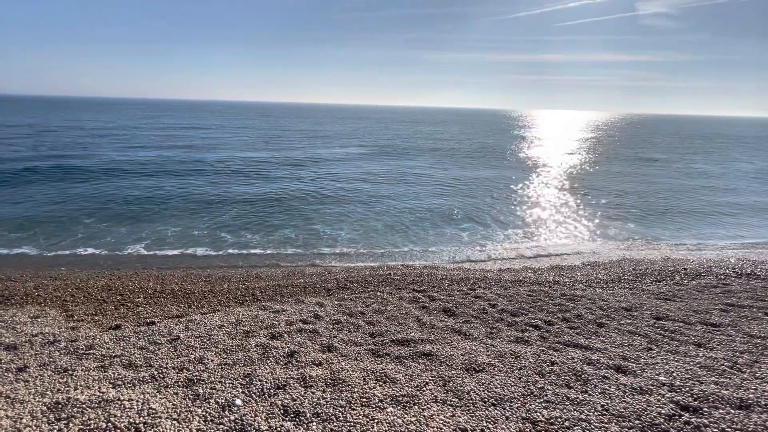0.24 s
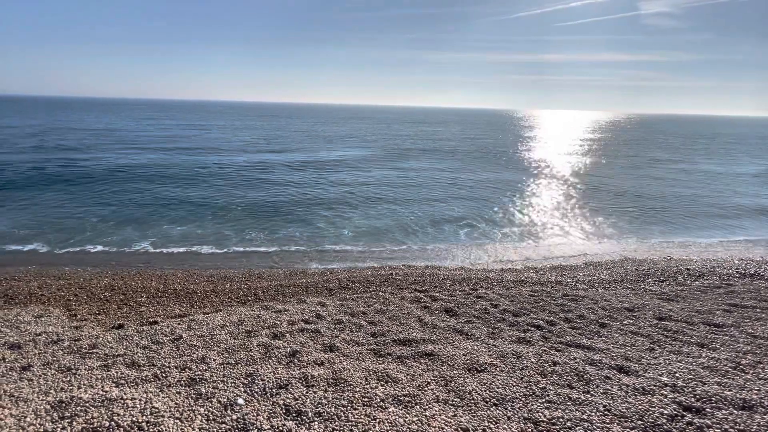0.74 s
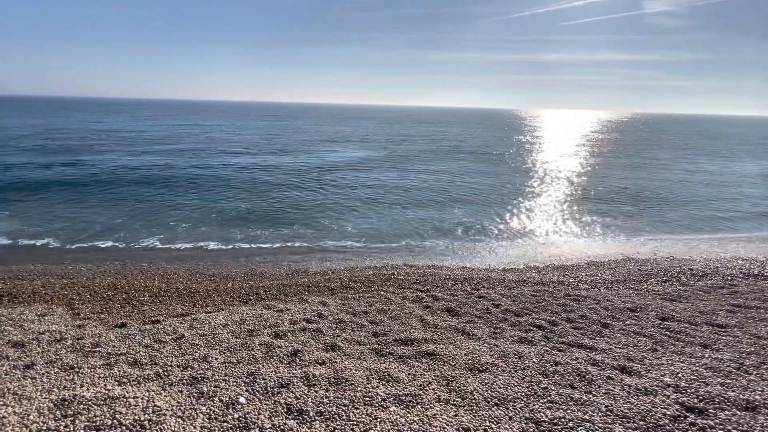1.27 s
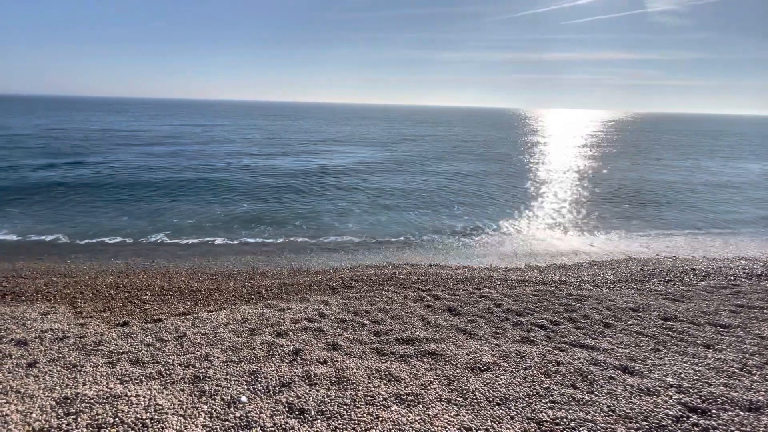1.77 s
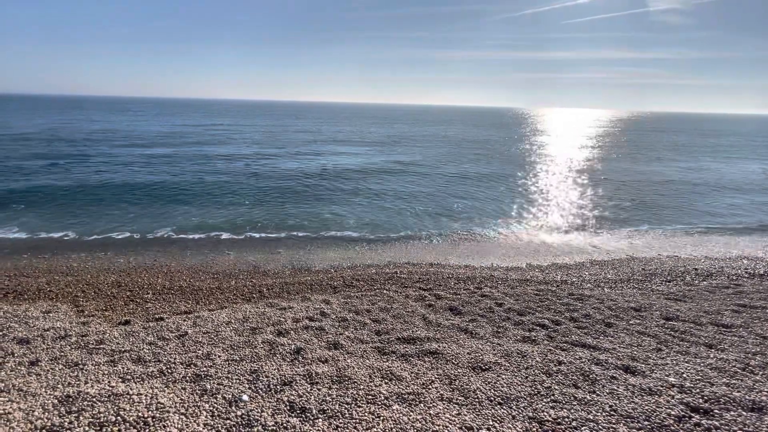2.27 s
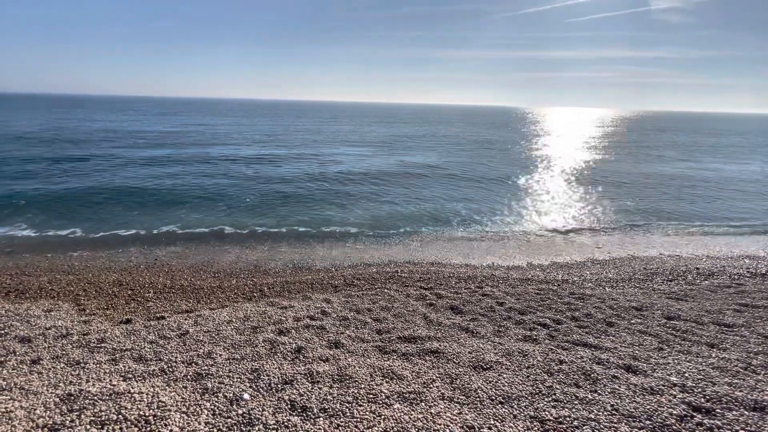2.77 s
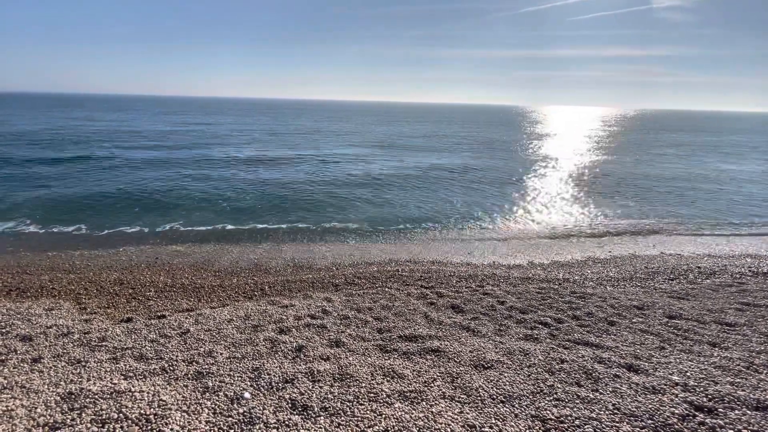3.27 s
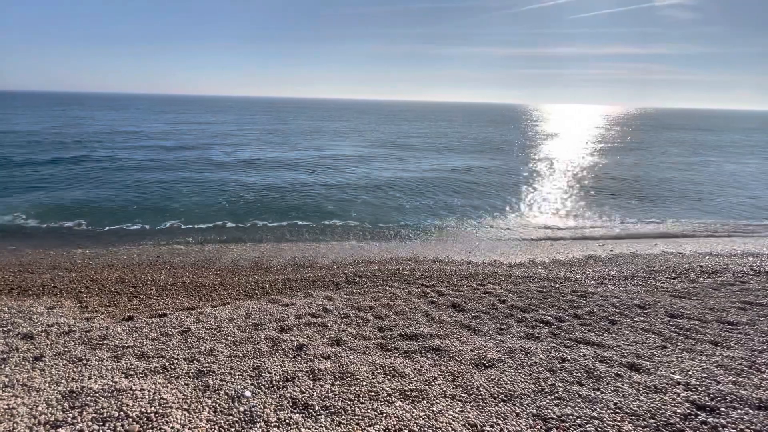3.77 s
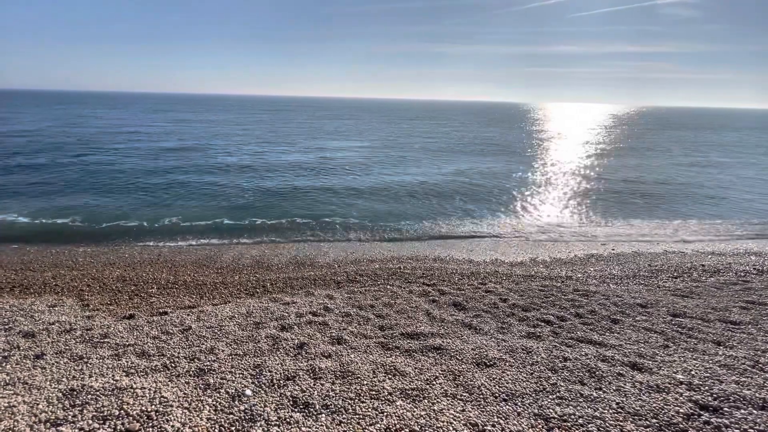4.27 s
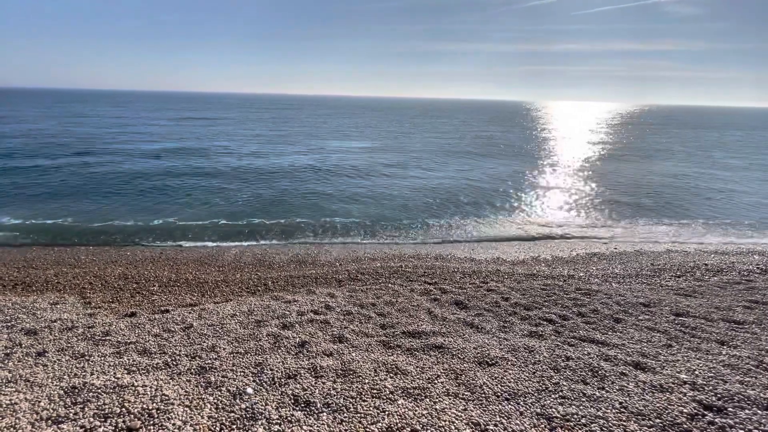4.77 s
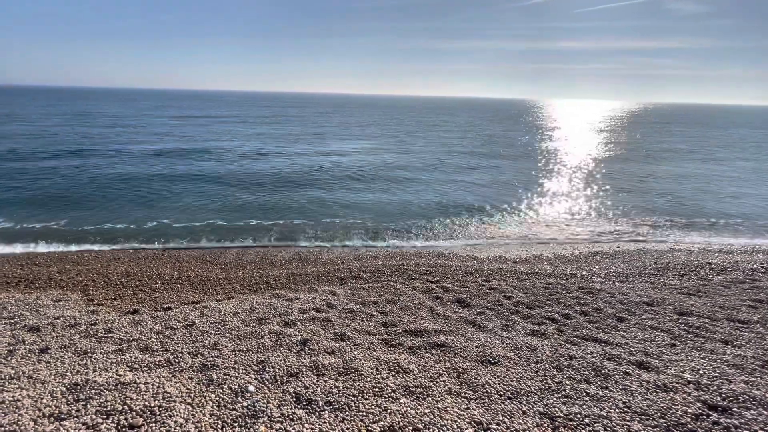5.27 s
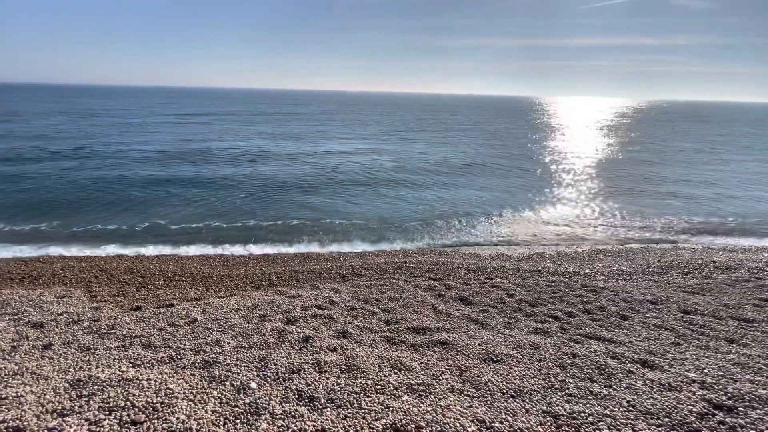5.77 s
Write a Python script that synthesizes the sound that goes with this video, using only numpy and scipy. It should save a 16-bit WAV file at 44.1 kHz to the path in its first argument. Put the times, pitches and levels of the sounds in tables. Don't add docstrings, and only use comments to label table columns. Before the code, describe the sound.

Close on an open shingle beach, foam fizzes steadily while retreating water drags pebbles in a dense rattle, strongest around the middle. A small wave then rolls over and crashes with a fuller, lower wash and light spray. Wind flutters the stereo microphone, thumping hard just after four seconds, above a very faint distant engine hum.

```python
import sys
import numpy as np
from scipy import signal
from scipy.fft import rfft, irfft
from scipy.io import wavfile
from scipy.ndimage import uniform_filter1d

SR = 44100
rng = np.random.default_rng(int(sys.argv[2]) if len(sys.argv) > 2 else 0)


def linear_from_db(decibels):
    return 10 ** (np.asarray(decibels, float) / 20)


def store_wav(level_fs):
    pcm = np.round(np.clip(np.atleast_2d(level_fs), -1, 1) * 32767)
    wavfile.write(sys.argv[1], SR, pcm.T.astype(np.int16))


N = 265393
FRAME, HOP = 1024, 256

# (frequency [Hz], left-right coherence [0-1], extra lead [rad])
CRASH_PORTS = [(250, 0.85, -0.1), (400, 0.9, 0.1), (550, 0.8, 0.1), (750, 0.64, -0.4), (950, 0.9, -0.2),
               (1200, 0.78, -0.4), (1450, 0.33, -1.2), (1700, 0.82, -1.3), (1950, 0.89, -1.3),
               (2200, 1, -2.8), (2500, 0.96, -2.2), (2800, 0.9, 0.0), (3100, 0.55, 0.6), (3400, 0.45, -0.4),
               (3800, 0.94, 0.4), (4200, 0.54, -0.2), (4700, 0.85, -0.3), (5200, 0.79, -0.1),
               (5700, 0.94, 0.2), (6200, 0.46, -0.3), (6700, 0.71, -0.1), (7300, 0.24, -0.2),
               (8000, 0.4, -0.1), (8800, 0.47, 0.0), (10300, 0.5, 0)]


def evened(x):
    return x / np.sqrt(np.mean(abs(x) ** 2) + 1e-20)


def columns(table, at, log=False):
    x, *values = np.transpose(table)
    bend = np.log1p if log else np.asarray
    return [np.interp(bend(at), bend(x), v) for v in values]


def drift(count, slow_hz, fast_hz, rate):
    t = np.arange(count) / rate
    total = 0
    for f in np.geomspace(slow_hz, fast_hz, 24):
        total = total + np.sin(2 * np.pi * (f * t + rng.random())) / np.sqrt(f)
    return evened(total)


def spectra(x):
    return signal.stft(x, SR, nperseg=FRAME, noverlap=FRAME - HOP)


def waveform(z):
    return signal.istft(z, SR, nperseg=FRAME, noverlap=FRAME - HOP)[1][:, :N]


def patchwork(shape, bands, frames):
    field = uniform_filter1d(rng.standard_normal(shape), size=bands, axis=-2)
    return evened(uniform_filter1d(field, size=frames, axis=-1))


def humps(t, crest, rise, fall):
    late = t - crest[:, None]
    width = np.where(late < 0, rise[:, None], fall[:, None])
    return np.exp(-2 * (late / width) ** 2)


def summed_db(bells, db, calm_db):
    return 10 * np.log10(linear_from_db(db) ** 2 @ bells + linear_from_db(calm_db) ** 2)


def surges(table, calm_db):
    crest, db, rise, fall = np.transpose(table)
    return lambda t: summed_db(humps(t, crest, rise, fall), db, calm_db)


def spray(per_s, spread_db):
    size_db = spread_db * np.minimum(rng.exponential(1, N), 5)
    size = linear_from_db(size_db) * rng.standard_normal(N)
    return spectra(evened(size * (rng.random(N) < per_s / SR)))


def water(level_db, colour, ports, per_s, spread_db, patchy_db, swell_db, low_hz=200, bearing=((0, 0),)):
    # (frequency [Hz], lead of left [rad])
    port_lead = [(100, .3), (250, 1.0), (400, 1.3), (550, 2.6), (750, 2.2), (950, 2.1), (1200, 2.85),
                 (1450, 3.35), (1700, 3.7), (1950, 3.9), (2200, 5.8), (2500, 6.3), (2800, 6.8),
                 (3100, 7.85), (3400, 8.4), (3800, 8.7), (4150, 11.6), (5000, 12.5), (5400, 14.7),
                 (5950, 14.9), (6200, 12.9), (6400, 12.7), (6800, 14.6), (7300, 14.8), (7700, 15.5),
                 (8500, 14.3), (9000, 15.3), (10300, 15.8)]
    hz, t, shared = spray(per_s, spread_db)
    own = spray(per_s, spread_db)[2]
    at, same, lead = np.transpose(ports)
    coherence = np.interp(hz, at, np.clip(same, 0, 1) * np.exp(-1j * lead))
    coherence = (coherence * np.exp(-1j * columns(port_lead, hz)[0]))[:, None]
    gains = linear_from_db(np.array(columns(colour, hz, log=True))) * hz ** 2 / (hz ** 2 + low_hz ** 2)
    gains /= np.sqrt(np.mean(gains[0] ** 2))
    patches = patchwork(shared.shape, bands=10, frames=10)
    swell = drift(len(t), 6, 24, SR / HOP)
    level = linear_from_db(level_db(t) + patchy_db * patches + swell_db * swell)
    right = coherence * np.exp(-1j * columns(bearing, t)[0]) * shared
    right = right + np.sqrt(1 - abs(coherence) ** 2) * own
    return np.array([shared, right]) * gains[:, :, None] * level


def foam():
    # (time [s], level [dB])
    hiss_level = [(0, -35), (0.5, -34), (1.0, -33), (1.5, -31.5), (1.9, -31), (2.4, -33), (2.9, -38),
                  (3.3, -38), (3.7, -34.5), (4.2, -36.5), (4.4, -32.5), (4.47, -32), (4.56, -34.5),
                  (4.9, -33), (5.2, -31), (5.6, -33.5), (6.0, -45.5)]
    # (frequency [Hz], left level [dB], right level [dB])
    colour = [(300.0, -25, -21.5), (470.0, -9.5, -13.5), (834, -11, -13.5), (1030.0, -3, -7),
              (1298, -1, -1), (1620, 1, -2), (1950, -1, -2.5), (2377, -1.5, -1), (2776, -3.5, -5.5),
              (3150, -4, -5.5), (3716, -4, -7.5), (4196, -8.5, -9), (4840, -7.5, -12), (5500, -7.5, -8.5),
              (6120, -4.5, -9), (6920, -9.5, -11.5), (7880, -13.5, -16.5), (8494, -19, -15),
              (11140, -29, -28), (12400, -42.5, -43), (13300, -44, -45), (13800.0, -49, -52)]
    # (frequency [Hz], left-right coherence [0-1], extra lead [rad])
    ports = [(250, 0.84, 0.2), (400, 0.85, 0.33), (547, 0.95, -0.72), (750, 1, 0.34), (948, 1, 1.03),
             (1201, 0.71, 0.1543), (1450, 0.87, -0.08), (1692, 0.89, -0.42), (1953, 0.6, 0.2051),
             (2210, 0.67, -0.79), (2526, 1, 0.25), (2840, 0.36, 0.58), (3100, 0.54, 0.13),
             (3410, 0.51, 0.22), (3820, 0.08, -0.36), (4200, 0.18, -0.4), (4670, 0.18, 0.63),
             (5140, 0.27, 2.5), (5780, 0.59, 0.62), (6210, 0.3, 0.42), (6700, 0.63, 0.24),
             (7330, 0.3, 1.52), (8040, 0.6, 0.46), (8730, 0.78, -0.4), (10300, 0.38, 0.3)]
    return water(lambda t: columns(hiss_level, t)[0], colour, ports,
                 per_s=36000, spread_db=1.6, patchy_db=0.7, swell_db=0.25)


def gusts(t):
    # (crest time [s], length [s], buffeting level [dB], roar level [dB], left minus right [dB])
    blows = [(0.0, 0.054, -55, -49.5, 20), (0.182, .045, -54.5, -51, 13), (0.26, 0.129, -49.5, -56, 6),
             (0.485, 0.05, -53.5, -60, 14.5), (1.001, 0.17, -63, -55.5, 3.5), (1.453, 0.21, -49, -61, 3),
             (1.897, 0.324, -55.5, -48.5, 9), (2.3, 0.21, -62, -56.5, -13), (2.5, 0.113, -55, -54, 2.5),
             (2.75, 0.15, -53, -54, 1.5), (3.08, 0.087, -52, -62, 11), (3.307, 0.089, -48, -41.5, 5),
             (3.502, 0.17, -47.5, -45, 4), (3.746, 0.153, -51, -43, 7), (4.068, 0.068, -40.5, -33.5, -9.5),
             (4.307, 0.287, -33.5, -36, 0), (4.492, 0.131, -43.5, -32.5, 15.5),
             (4.7, 0.091, -52.5, -38.5, 1), (4.885, 0.102, -61.5, -39.5, -7),
             (5.111, 0.138, -49.5, -39.5, 5), (5.29, 0.344, -63, -34, 0), (5.559, 0.135, -40, -34.5, 5.5),
             (5.82, 0.15, -50, -52, 8), (6.0, 0.159, -45.5, -40, 1.5)]
    calm_db = -66.5
    crest, length, buffet_db, roar_db, pan_db = np.transpose(blows)
    bells = humps(t, crest, 0.885 * length, 0.94 * length)
    push = linear_from_db(buffet_db) ** 2
    lean_db = (push * pan_db) @ bells / (push @ bells + linear_from_db(calm_db) ** 2)
    return summed_db(bells, buffet_db, calm_db), summed_db(bells, roar_db, -54), lean_db


def roar():
    # (frequency [Hz], left level [dB], right level [dB])
    colour = [(60, -2, -7.5), (131, -5, -6), (250, -1, -3), (398, 1.5, -1.5), (471.5, -7, -8),
              (564, -12, -16), (900, -33, -39.5), (3000, -69.5, -70.5)]
    # (frequency [Hz], left-right coherence [0-1], extra lead [rad])
    ports = [(100, 0.9, -0.36), (250, 0.94, -1.03), (398, 0.88, -1.07), (550, 0.97, -1.95)]
    # (time [s], extra lead [rad])
    bearing = [(0, 1.2), (1.4, 1.2), (2.3, 0.6), (3.2, -0.3), (3.9, -0.45), (4.5, 1.2), (5.3, 0.9),
               (6, 0.8)]
    return water(lambda t: gusts(t)[1] - 3, colour, ports, per_s=3000, spread_db=0.5,
                 patchy_db=1.0, swell_db=1.0, low_hz=30, bearing=bearing)


def buffet():
    # (frequency [Hz], level [dB])
    spectrum = [(15, -39), (45, 11), (80, 4.5), (150, 1), (300, -8), (600, -39.5)]
    coarse = np.arange(0, N + HOP, HOP)
    level_db, _, pan_db = (np.interp(np.arange(N), coarse, v) for v in gusts(coarse / SR))
    colour = linear_from_db(columns(spectrum, np.fft.rfftfreq(N, 1 / SR), log=True)[0])
    a, b = (evened(irfft(rfft(v) * colour, N)) for v in rng.standard_normal((2, N)))
    lumps = linear_from_db(level_db + 2.94 * drift(N, 14, 40, SR))
    left = a * linear_from_db(pan_db / 2)
    right = (0.827 * a + 1.006 * b) * linear_from_db(-pan_db / 2)
    return lumps * np.array([left, right])


def puffs():
    # (time [s], level [dB], length [s], frequency [Hz])
    across = [(0.236, -34.5, .007, 107), (0.93, -40, 0.0128, 122), (1.04, -49, .015, 70),
              (1.1, -49.5, .015, 61), (3.39, -38.5, 0.02, 58), (3.462, -42.5, 0.02, 62),
              (3.55, -42.5, 0.017, 75), (1.501, -39, 0.0077, 85), (1.51, -43.5, .018, 78),
              (2.6, -45.5, 0.0097, 110), (2.596, -45.5, 0.02, 89), (3.945, -43, .008, 110.6),
              (4.012, -13, 0.0136, 106.7), (4.014, -24.5, 0.0087, 278), (4.048, -14, 0.01, 117),
              (4.062, -24, 0.014, 96), (4.076, -17, .01, 170), (4.089, -13.5, .016, 81.6),
              (4.111, -22, .014, 77.5), (4.163, -29, 0.018, 75.5), (4.3, -28, 0.02, 79),
              (4.275, -31.5, .015, 241), (4.205, -29.5, .018, 73), (4.195, -31, .015, 294),
              (4.53, -29, .012, 233), (4.55, -34, .012, 427), (4.46, -15.5, 0.0143, 113),
              (4.454, -21, 0.00914, 246), (4.473, -24.5, .009, 260), (4.575, -29.5, 0.0188, 105),
              (4.483, -17, .012, 102), (4.36, -27, .012, 91), (4.664, -37, 0.0146, 139.7),
              (5.146, -43, 0.0085, 100), (5.303, -43, 0.0064, 170), (5.555, -29.5, 0.0154, 120),
              (5.583, -27.5, .011, 152), (5.62, -31, 0.0162, 92), (5.591, -22, 0.006, 252),
              (5.848, -37.5, 0.0178, 105)]
    # (time [s], level [dB], length [s], frequency [Hz])
    windward = [(0.009, -48, .011, 90), (0.053, -52, .008, 111), (0.315, -52, .012, 70),
                (0.53, -51.5, .035, 60), (0.225, -52, .012, 186), (0.161, -43, 0.0073, 83),
                (0.254, -38.5, 0.0128, 107), (0.346, -40.5, 0.0055, 144), (0.925, -52, 0.015, 200),
                (1.229, -47, 0.0122, 79), (1.606, -48, 0.023, 84), (2.484, -47.5, 0.00916, 85),
                (3.18, -41, 0.026, 66), (3.23, -39, 0.021, 75), (3.707, -40.5, .02, 74),
                (3.2, -45, 0.013, 110), (4.09, -31.5, 0.013, 249), (4.062, -32, .02, 64),
                (3.8, -39, 0.023, 48.4), (4.077, -29, 0.011, 205), (4.2, -44, .04, 251),
                (4.278, -36, 0.031, 161), (4.76, -46, 0.026, 99.3), (5.14, -43.5, .02, 58.4),
                (5.327, -43.5, 0.014, 118), (5.56, -38, 0.03, 77.4), (5.753, -34, 0.015, 76.7),
                (5.74, -37.5, 0.0076, 170), (3.991, -42, 0.021, 103), (4.356, -41.5, .02, 69),
                (4.397, -39.5, 0.0229, 56), (4.54, -46.5, .025, 65), (4.871, -55.5, .03, 60),
                (0.264, -39.5, 0.011, 157), (0.18, -46, 0.00705, 95), (0.202, -42.5, 0.0091, 94),
                (0.225, -46.5, .01, 61), (0.373, -48.5, 0.01305, 65), (4.05, -29.5, 0.0074, 230),
                (3.7, -33, 0.0114, 73), (4.47, -36.5, .015, 410), (4.17, -36, 0.0177, 56),
                (4.11, -34, 0.013, 105.6)]
    eddies = [(*row, 0) for row in across] + [(*row, 16) for row in windward]
    out = np.zeros((2, N + SR))
    luck = rng.standard_normal((len(eddies), 2, 8192))
    for (s, db, length, hz, pan_db), noise in zip(eddies, luck):
        t = np.arange(-1.2 * length, 3 * length, 1 / SR)
        shape = np.exp(-(t / np.where(t < 0, 0.5 * length, length)) ** 2)
        swing = np.cos(2 * np.pi * (0.961 * hz * t * (1 - 7.3 * t) + noise[0, 0]))
        band = signal.butter(2, [hz, 1.916 * hz], "band", fs=SR, output="sos")
        rough = 0.28 * evened(signal.sosfilt(band, noise)[:, -len(t):])
        rough[1] = 0.935 * rough[0] + 0.61 * rough[1]
        at = max(round((s + t[0]) * SR), 0)
        gain = linear_from_db(db + 2.0 + np.array([[pan_db / 2], [-pan_db / 2]]))
        out[:, at:at + len(t)] += gain * (swing + rough) * shape
    return out[:, :N]


def wind():
    # (frequency [Hz], lag [rad])
    lags = [(180, 0.071), (260, 0.32), (400, 2.18)]
    left, right = buffet() + puffs()
    lag = columns(lags, np.fft.rfftfreq(N, 1 / SR))[0]
    return np.array([left, -irfft(rfft(right) * np.exp(1j * lag), N)])


def boat():
    # (time [s], firing rate [Hz], level [dB])
    engine = [(0, 92.2, -58), (.6, 90.3, -61), (1.4, 91.5, -57), (2, 92.5, -56.5), (2.4, 91.65, -51),
              (3, 90.98, -50), (3.5, 91.42, -46), (4, 90.93, -44), (4.5, 90, -69), (4.9, 91.0, -70.5),
              (6, 89.06, -56.5)]
    # (multiple of firing rate [1], level [dB])
    harmonics = [(1, 2), (2, -13.5), (3, -24.5)]
    hz, level_db = columns(engine, np.arange(N) / SR)
    turns = np.cumsum(hz * (1 + 0.0107 * drift(N, 2.9, 23.58, SR))) / SR
    orders = 0
    for k, db in harmonics:
        orders = orders + linear_from_db(db + 1.98 * drift(N, 2.6, 18, SR)) * np.cos(2 * np.pi * k * turns)
    band = signal.butter(2, [46, 115], "band", fs=SR, output="sos")
    rumble = evened(signal.sosfilt(band, rng.standard_normal(N)))
    gain = linear_from_db(level_db - 1 + np.array([[0.6], [-0.6]]))
    return gain * (orders + linear_from_db(-2.5) * rumble)


def backwash():
    # (crest time [s], level [dB], rise [s], fall [s])
    drags = [
        (0.0, -41.5, .1, 0.4),
        (1.5, -43, 0.274, .3),
        (2.05, -33.5, 0.502, 0.293),
        (2.55, -28.5, 0.599, 0.84),
        (3.1, -29.5, 0.86, 0.367),
        (3.5, -30.5, 0.53, 0.409),
        (4.0, -32.5, 0.574, 0.38),
        (4.8, -34, 0.06, 0.125),
        (6.05, -37.5, 0.117, 0.205),
    ]
    # (frequency [Hz], left level [dB], right level [dB])
    colour = [(300, -17, -18.5), (666, -18.5, -19), (813.6, -7, -11), (1055, -4, -3), (1306, -0.5, -7),
              (1580, -3.5, -7), (1934, 1, -7.5), (2410, -3.5, -8.5), (2956, -4.5, -8), (3240, -11, -9),
              (3970, -12, -10.5), (5000, -17, -12), (5620, -9, -15), (6200, -14.5, -15), (7500, -12, -23),
              (8490, -19, -31), (9360, -26.5, -32), (11680, -33, -36), (12700, -52, -49.5),
              (13500, -44, -55)]
    # (frequency [Hz], left-right coherence [0-1], extra lead [rad])
    ports = [(250, 0.8, -1.0), (400, 0.8, -1.9), (470, 0.85, -2.9), (550, 0.9, 2.0), (750, 0.41, 2.8),
             (950, 0.34, -2.4), (1200, 0.17, 2.2), (1450, 0.55, 0.0), (1700, 0.56, -0.0),
             (1950, 0.26, -3.0), (2200, 0.47, 1.8), (2500, 0.38, -1.0), (2800, 0.79, -0.3),
             (3100, 0.63, 0.1), (3400, 0.22, 0.2), (3800, 0.41, -0.8), (4200, 0.41, -0.0),
             (4700, 0.56, -0.2), (5200, 0.65, -0.3), (5700, 0.72, -0.0), (6200, 0.69, -0.2),
             (6700, 0.53, -0.4), (7300, 0.25, 0.1), (8000, 0.35, 0.3), (8800, 0.34, -0.1), (10300, 0.5, 0)]
    return water(surges(drags, calm_db=-49), colour, ports,
                 per_s=24000, spread_db=0.9, patchy_db=0.7, swell_db=0.1)


def roll():
    # (crest time [s], level [dB], rise [s], fall [s])
    rolls = [
        (1.5, -53, 0.37, 0.27),
        (3.0, -40.5, 0.72, 0.274),
        (3.6, -38, 0.46, 0.457),
        (4.4, -28.5, 0.66, 0.722),
        (5.9, -40.5, 0.284, .3),
    ]
    # (frequency [Hz], left level [dB], right level [dB])
    colour = [(297, -5, -6.5), (465, -4, -5.5), (1034, -2, -8.5), (1455, -14.5, -8), (1633, -1.5, -1.5),
              (2050, -11.5, -13), (2600, -7, -10.5), (3360.0, -14, -20), (3960, -14, -16.5),
              (4910, -28, -23.5), (5670, -16, -16), (7000, -19, -24), (8700, -24.5, -22),
              (10400, -41.5, -28.5), (13200, -36, -39.5), (13800.0, -54, -54)]
    # (frequency [Hz], left-right coherence [0-1], extra lead [rad])
    ports = [(250, 0.8, -0.1), (400, 0.75, 0.2), (550, 0.85, 0.2), (750, 0.71, 0.4), (950, 0.53, 0.2),
             (1200, 0.77, -0.4), (1450, 0.69, -0.0), (1700, 0.74, 0.5), (1950, 0.46, 0.1),
             (2200, 0.25, -0.3), (2500, 0.76, -0.3), (2800, 0.83, 0.2), (3100, 0.44, 0.3), (3400, 0.6, 0.6),
             (3800, 0.43, 1.3), (4200, 0.23, 2.1), (4700, 0.44, 1.4), (5200, 0.16, 2.1), (5700, 0.93, 0.9),
             (6200, 0.69, 1.0), (6700, 0.81, 1.0), (7300, 0.65, 0.5), (8000, 0.58, -0.3),
             (8800, 0.56, -0.4), (10300, 0.5, 0)]
    return water(surges(rolls, calm_db=-50), colour, ports,
                 per_s=24000, spread_db=1.5, patchy_db=1.48, swell_db=0.81)


def crash():
    # (crest time [s], level [dB], rise [s], fall [s])
    crashes = [
        (2.0, -44.5, .15, 0.147),
        (2.4, -45.5, 0.104, .12),
        (2.8, -43.5, 0.22, 0.12),
        (3.3, -42, 0.138, 0.23),
        (4.85, -37, 0.265, 0.32),
        (5.5, -27.5, 0.808, 0.514),
        (6.0, -29.5, 0.424, 0.32),
    ]
    # (frequency [Hz], left level [dB], right level [dB])
    colour = [(294, -16.5, -13), (484, -8, -6), (564.7, -2.5, -9), (678, -1, -6), (768, 2.5, -7),
              (900, -0.5, -5.5), (980, -4, -6.5), (1140, -6, -9), (1570, -10.5, -15), (2280, -14.5, -23.5),
              (2629.8, -9.5, -23.5), (3870, -22.5, -18), (5200, -21, -22), (6900, -18.5, -29.5),
              (8180, -20, -26.5), (12890, -42, -31.5), (13700, -37.5, -48.5)]
    return water(surges(crashes, calm_db=-52), colour, CRASH_PORTS,
                 per_s=24000, spread_db=1.52, patchy_db=0.8, swell_db=0.63)


def splash():
    # (crest time [s], level [dB], rise [s], fall [s])
    splashes = [
        (5.12, -39, 0.085, 0.227),
        (5.5, -41, 0.26, 0.216),
    ]
    # (frequency [Hz], left level [dB], right level [dB])
    colour = [(2500, -24.5, -30.5), (3800, 0.5, -17), (4500, 5.5, 2), (5500, -11, 2.5), (7000, -0.5, -8),
              (10000, -17, -20), (13500, -40, -42)]
    return water(surges(splashes, calm_db=-65), colour, CRASH_PORTS,
                 per_s=4900, spread_db=4.0, patchy_db=0.0, swell_db=1.5)


def scene():
    shore = foam() + roar() + backwash() + roll() + crash() + splash()
    return waveform(shore) + wind() + boat()


def flicker(x):
    # (frequency [Hz], drift of gain [dB])
    unrest = [(1500, 0), (3500, 1.2), (5000, 1.6), (8500, 1.9), (9300, 3.2), (10500, 2.8), (15700, 2.2)]
    hz, _, z = spectra(x)
    patches = patchwork(z.shape, bands=5, frames=10)
    return waveform(z * linear_from_db(columns(unrest, hz)[0][:, None] * patches))


def top_cut(x):
    return signal.sosfilt(signal.butter(12, 15750, fs=SR, output="sos"), x)


def record(dry):
    # (frequency [Hz], gain [dB])
    mid_kept = [(13000, 0.0373), (13300, -10.5), (13700, -79.5)]
    # (frequency [Hz], gain [dB])
    side_kept = [(9200, -0.5), (9900, -6), (11000, -8.5), (12200, -13.5), (13000, 0.5), (14200, 6.5),
                 (15700, 8.5)]
    hz = np.fft.rfftfreq(N, 1 / SR)
    limited = 0.6084 * np.tanh(dry / 0.6016)
    left, right = rfft(limited) * hz ** 3 / (hz ** 3 + 33.8 ** 3)
    mid = (left + right) / 2 * linear_from_db(columns(mid_kept, hz)[0])
    side = (left - right) / 2 * linear_from_db(columns(side_kept, hz)[0])
    mid, side = flicker(irfft(np.array([mid, side]), N))
    mix = np.array([mid + side, mid - side])
    return top_cut(mix)


dry = scene()
out = record(dry)
store_wav(out)
```